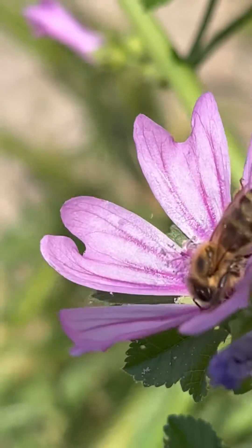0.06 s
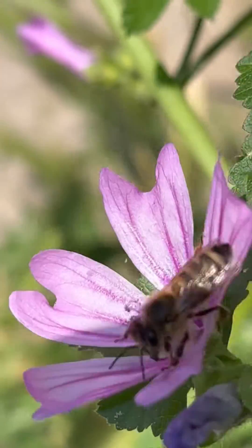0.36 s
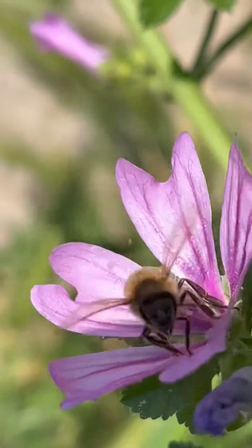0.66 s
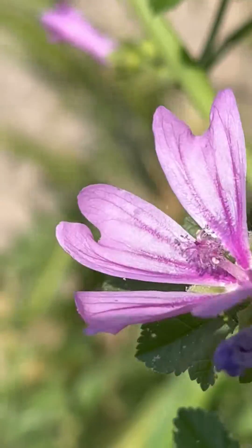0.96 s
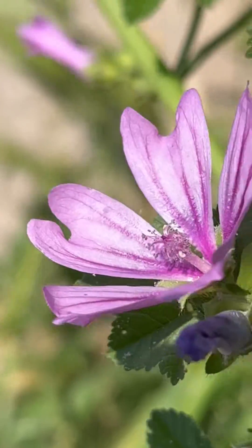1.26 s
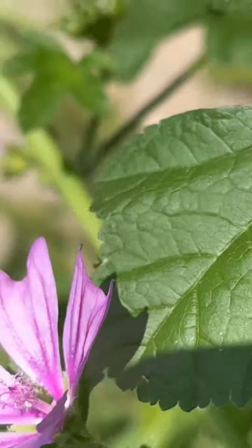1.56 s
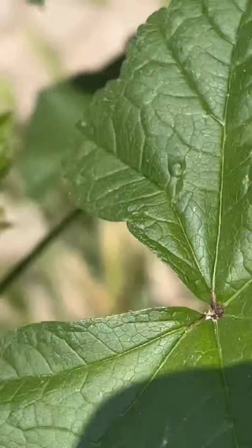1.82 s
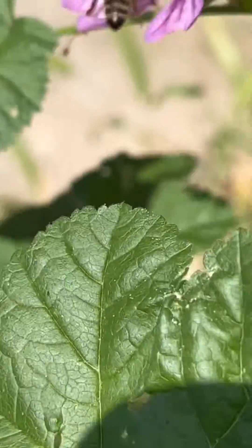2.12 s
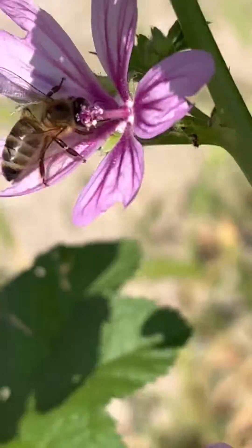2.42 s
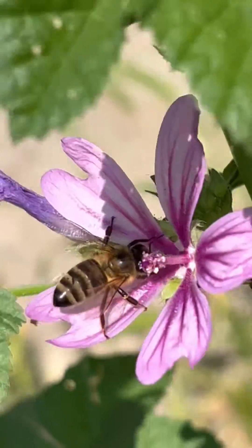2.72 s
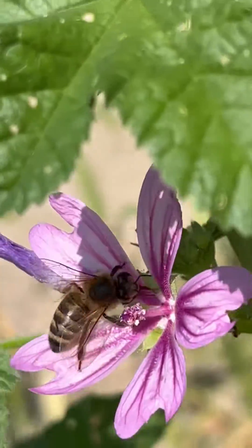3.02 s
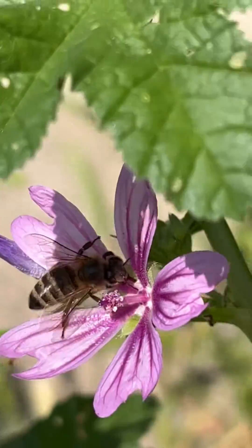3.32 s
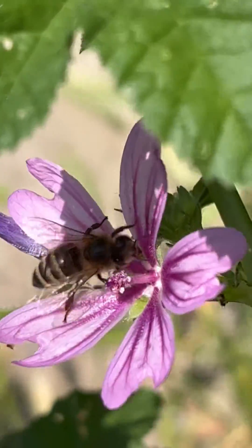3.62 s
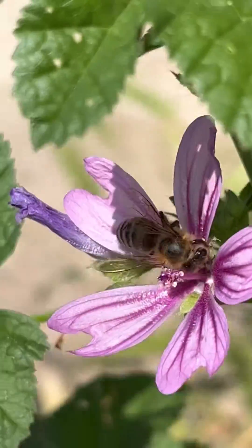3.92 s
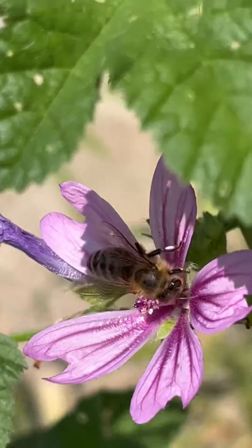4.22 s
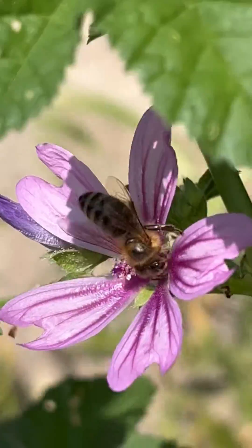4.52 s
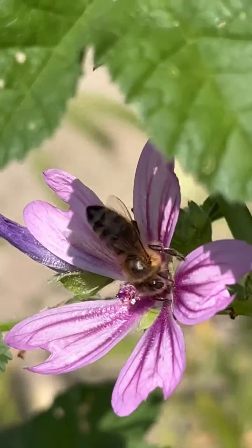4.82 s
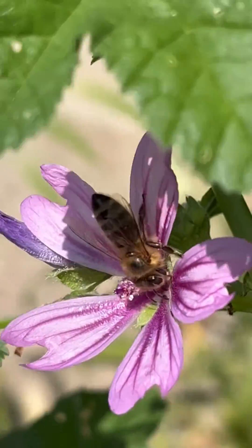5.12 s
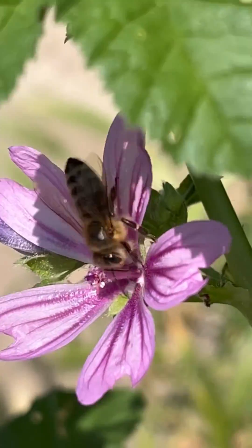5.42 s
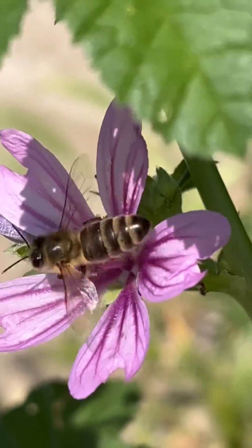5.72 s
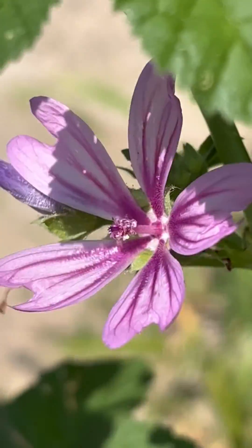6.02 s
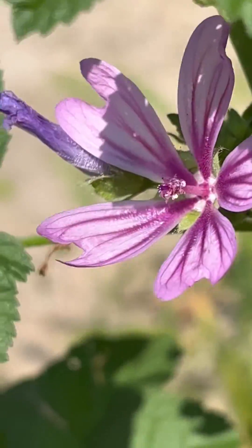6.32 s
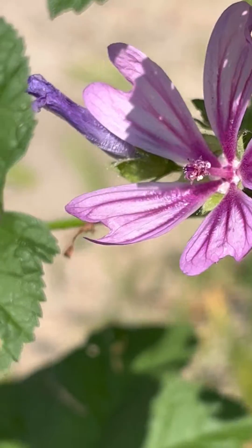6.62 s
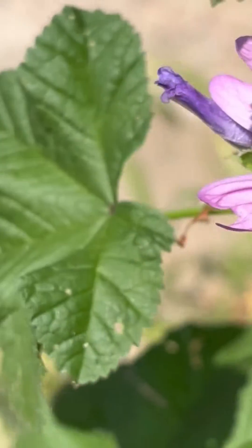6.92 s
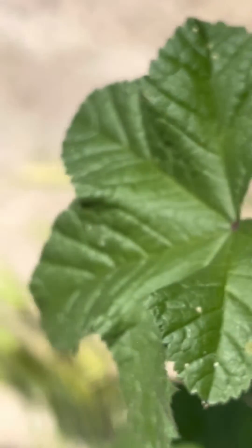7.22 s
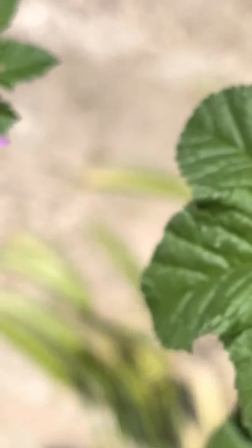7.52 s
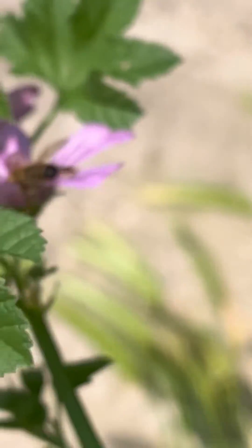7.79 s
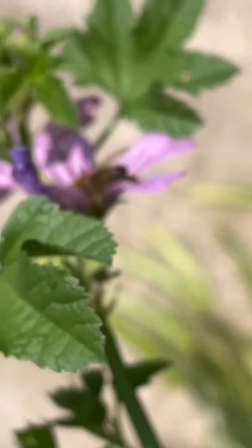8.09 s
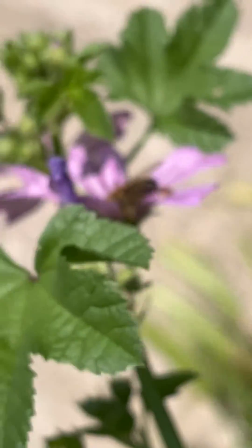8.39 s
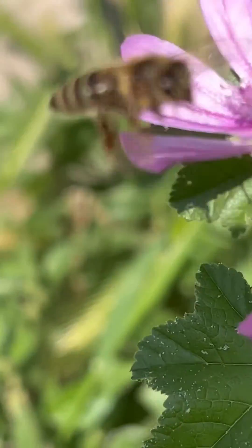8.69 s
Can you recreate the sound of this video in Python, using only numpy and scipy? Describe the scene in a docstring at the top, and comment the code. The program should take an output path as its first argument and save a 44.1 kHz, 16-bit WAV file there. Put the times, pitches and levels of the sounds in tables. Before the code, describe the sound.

Small birds chirp in a garden; a nearby bee buzzes briefly, and later a scratchy warbling song rises over gusty wind rumble.

```python
"""A bee hums low and sparrows chirp over a garden's murmur; almost at once a closer honey bee flies off a
mallow flower, each wing stroke a pulse of pressure, until its buzz stops abruptly. A warbler's syrinx
sings a long, scratchy phrase with a short echo, amid faint twitter and a distant drone. From 3.6 s a
breeze buffets the microphone with a lumpy rumble and stirs the leaves; near the end wings hiss again."""
import sys
import numpy as np
from scipy import signal
from scipy.fft import rfft, irfft, next_fast_len
from scipy.io import wavfile
from scipy.ndimage import uniform_filter1d

SR = 44100
rng = np.random.default_rng(int(sys.argv[2]) if len(sys.argv) > 2 else 0)


def persist_wave(psi):
    """Save psi, clipped to +-1, as 16-bit WAV."""
    counts = np.round(np.clip(psi, -1, 1) * 32767).astype(np.int16)
    wavfile.write(sys.argv[1], SR, np.atleast_2d(counts).T)


N = 394694
TIME = np.arange(N) / SR

# Noise spectra. Each row: frequency in Hz, relative spectral density in dB.
MURMUR_SPECTRUM = [(25, -10), (55, -2), (100, -4.5), (156, -8), (230, -5), (500, -17), (970, -16.5),
                   (1200, -23.5), (1950, -25), (3200, -35.5), (5000, -46.5), (8300, -52.5), (15500, -54.5)]
LEAF_SPECTRUM = [(2000, 17), (4500, 8), (6500, -2), (8300, -9), (9800, 1.5), (11500, -11), (15000, -10.5)]
DRONE_SPECTRUM = [(35, -12), (62, -7.5), (78, 0.5), (100, -19.5)]
CHIRP_SPECTRUM = [(3000, -11), (4200, 7), (5500, -0.5), (7200, -4.5), (8800, -24), (10500, -11.5),
                  (13000, -21.5)]
WING_SPECTRUM = [(1180, -1.5), (2000, -19), (2200, -21.5), (3370, -3.5), (4250, -4), (4920, -7),
                 (6090, -10.5), (7950, -1.5), (9760, -5.5), (12000, -2.5), (15500, -8.5)]
RUMBLE_SPECTRUM = [(24, -20.5), (50, 5), (80, 3), (165, -11.5), (350, -27), (500, -38), (900, -54)]
# Envelopes. Each row: time in seconds, relative level in dB.
MURMUR_LEVEL = [(0, -48.5), (2.5, -50.5), (5.5, -48)]
RUSTLE_LEVEL = [(0, -57), (.35, -85), (1.9, -97), (4.4, -68), (5.3, -59.5), (7.4, -59.5), (8.45, -58.5),
                (8.95, -59)]
DRONE_GROWTH = [(0, -50), (1.8, -51), (3.2, -40)]
BREEZE_LEVEL = [(3.58, -51), (3.66, -29.5), (4.3, -30.5), (4.55, -17), (4.76, -29), (5.05, -23),
                (5.35, -25), (5.6, -23.5), (5.8, -13.5), (6.1, -15.5), (6.25, -22.5), (7.05, -17.5),
                (7.38, -27), (7.6, -29.5), (7.8, -16.5), (8.95, -19)]
FINE_TURBULENCE_LEVEL = [(3.7, -20), (4.6, -10), (5.3, -0.5), (6.0, -7), (6.4, 12), (6.7, 3.5), (7.25, -2),
                         (8.1, -3.5), (8.9, 7.5)]
LIFT_OFF_LEVEL = [(8.3, -76), (8.99, -61.5)]
# The farther bee's hum. Each row: time in seconds, wing beat in Hz, level in dB.
FAR_FLIGHT = [(0, 208.1, -44.5), (1.05, 210.2, -40), (1.3, 213, -55)]
# Sparrow chirps. Each row: start in seconds, length in seconds, nominal top pitch in Hz,
# relative level in dB, harshness in dB.
SPARROW_CHIRPS = [(0, 0.046, 3760, -48.5, -8.5), (0.135, 0.042, 4190, -54.5, -5.5),
                  (0.213, 0.0297, 5270, -55.5, -10), (0.229, 0.09, 4240, -55.5, -3),
                  (1.565, 0.039, 4140, -47, -9), (1.616, 0.034, 3520, -45, -17),
                  (1.747, 0.046, 3717, -50, -10), (2.277, 0.036, 4190, -60, -7),
                  (2.776, 0.062, 3700, -55.5, -5.5), (3.236, .058, 3583, -41.5, -9.5),
                  (3.345, 0.037, 4020, -55, -12), (4.088, 0.045, 4490, -60, -3),
                  (4.146, 0.035, 4180, -50, -10), (4.201, 0.032, 3630, -52, -9),
                  (4.474, 0.061, 3855, -49.5, -9), (6.271, 0.077, 4500, -54, -5.5),
                  (6.513, 0.081, 4280, -50.5, -1.5)]
# The close bee's flight. Each row: time in seconds, then levels in dB of the wing beat common to both
# sides, the beat that differs between them, the buzz and the wing hiss.
CLOSE_FLIGHT = [(0.3, -67, -68, -74, -70), (0.45, -52, -54, -63.5, -57), (0.66, -43, -46, -56.5, -52.5),
                (0.92, -44, -42, -51.5, -46), (1.1, -49.5, -41, -52, -47), (1.4, -51, -40.5, -49.5, -48.5),
                (1.784, -48.5, -40.5, -49, -46)]
# Its fundamental. Each row: time in seconds, wing beat in Hz.
WING_RATE = [(0.4, 276.6), (0.71, 263.3), (0.944, 273.2), (1.108, 257.7), (1.16, 267.3), (1.29, 255.5),
             (1.385, 272.5), (1.516, 255.5), (1.542, 269.7), (1.58, 261.7), (1.645, 256.8), (1.67, 265),
             (1.77, 257.5)]
# Its buzz. Each row: harmonic number, relative level in dB.
BUZZ_HARMONICS = [(2, 7.5), (3, -6), (4, -4), (5, -6.5), (6, -4.5), (7, -7.5), (8, -17.5), (11, -14.5),
                  (13, -11.5), (14, -22), (16, -16.5), (18, -24)]
# Brief, thin high ticks; the one at 5.57 s is a bird's buzzy chip.
# Each row: start in seconds, relative level in dB.
THIN_TICKS = [(2.363, -53.5), (5.569, -48), (8.427, -49.5)]
# Warbler slurs. Each row: start and length in seconds, first and last pitch in Hz, relative level in dB.
SLURS = [(2.665, 0.27, 2540, 2450, -57.5), (3.114, 0.1, 2630, 2544, -51), (3.812, 0.23, 2536, 2530, -52.5),
         (4.581, 0.021, 3210, 2810, -45.5), (4.612, 0.027, 2970, 3026, -35.5),
         (4.905, 0.046, 3750, 3540, -41), (4.984, 0.048, 3550, 3723, -42), (5.088, 0.019, 5300, 6740, -49),
         (5.125, 0.026, 7820, 8300, -56.5), (5.227, 0.028, 4200, 4590, -44),
         (5.247, 0.041, 4430, 3670, -44), (5.333, 0.056, 3640, 4700, -44.5), (5.416, 0.07, 3130, 2626, -39),
         (5.417, 0.078, 2220, 1996, -37.5), (5.591, 0.011, 3440, 2960, -35),
         (5.568, 0.034, 5630, 5350, -51), (5.681, 0.062, 7160, 4720, -45), (5.749, 0.06, 2280, 2054, -35),
         (5.911, 0.043, 3950, 3580, -41.5), (6.111, 0.021, 3180, 2810, -35.5),
         (6.247, 0.04, 2560, 2490, -42.5), (6.326, 0.068, 2160, 2420, -27), (6.491, 0.045, 2884, 2845, -35),
         (6.574, 0.13, 2280, 1809, -32), (6.66, 0.08, 3060, 2610, -37), (6.798, 0.045, 4160, 3806, -40.5),
         (6.986, 0.065, 3176, 3084, -40.5), (7.151, 0.065, 5660, 4064, -43),
         (7.257, 0.045, 3490, 3173, -38), (7.494, 0.011, 3390, 3100, -34), (7.54, 0.058, 1955, 1850, -44.5),
         (7.577, 0.052, 2630, 2885, -39.5), (7.883, 0.055, 4770, 4820, -61.5),
         (8.083, .06, 2280, 1840, -34.5), (8.095, .1, 4930, 5190, -58), (8.766, 0.13, 2713, 2468, -31.5)]
# Arched notes. Each row: start and length in seconds, top pitch in Hz, relative level in dB.
ARCHED_NOTES = [(5.666, 0.09, 2940, -39.5), (5.815, 0.028, 3106, -38), (6.533, 0.028, 3070, -31),
                (8.026, 0.064, 2580, -31)]
# Trills. Each row: the five columns of a slur, then mean turns per second, full pitch depth in Hz.
TRILLED_NOTES = [(2.923, 0.26, 2185, 2050, -56, 54, 130), (3.593, 0.31, 2196, 2076, -56.5, 54, 150),
                 (4.802, 0.067, 2910, 2520, -45, 37, 100), (5.326, 0.096, 2650, 2320, -44, 42, 160),
                 (5.595, 0.085, 2022, 2030, -38, 42, 70), (5.969, 0.24, 1706, 2002, -34.5, 34, 119),
                 (5.982, 0.12, 3247, 3170, -36, 40, 170), (6.282, 0.046, 2130, 2150, -31.5, 85, 150),
                 (6.392, 0.06, 2310, 2387, -30, 43, 220), (6.844, 0.11, 2935, 2350, -29, 46, 108),
                 (7.635, 0.13, 2310, 2440, -32, 25, 322), (7.792, 0.089, 2960, 3100, -36.5, 88, 130),
                 (7.992, .04, 2000, 2240, -33, 85, 167), (8.35, 0.05, 2690, 2720, -41.5, 76, 150),
                 (8.446, 0.23, 1677, 2376, -34, 54, 146)]
# Higher notes are more strained. Each row: pitch in Hz, overtone level in dB against the fundamental.
SYRINX_OVERTONES = [(2000, -44.5), (2600, -44.5), (4000, -30)]
# Puffs of wind. Each row: time of the peak in seconds, height above the breeze in dB.
WIND_PUFFS = [(3.73, 11.5), (4.14, 12.5), (4.375, 11.5), (5.35, 4.5), (6.57, 5.5), (6.711, 6.5), (6.89, 1),
              (7.094, 6.5), (7.46, 7), (7.63, 6), (7.74, 10), (7.92, 6.5), (8.125, 5.5), (8.559, -1),
              (8.902, 4)]
# Single eddies. Each row: start and rise time in seconds, relative levels of thump and ruffle in dB.
EDDY_THUMPS = [(4.364, 0.0094, -14, -37), (5.74, 0.0075, 5, -38), (5.8, 0.0092, -1.5, -38),
               (5.855, 0.0081, 0.5, -35), (6.069, 0.0065, -2.5, -34), (6.498, 0.0094, -1.5, -26.5),
               (6.528, 0.017, 5.5, -16.5), (7.035, 0.0071, -6.5, -29), (7.722, 0.011, -0.5, -34),
               (7.908, 0.006, -5.5, -35), (8.006, 0.011, -3, -46), (8.112, 0.0079, 0.5, -24.5),
               (8.358, 0.0094, -4.5, -30.5), (8.458, 0.011, 0, -22), (8.539, 0.01, -0.5, -42),
               (8.646, 0.0097, -8, -25.5), (8.748, 0.0085, -8, -24), (8.87, 0.017, -3, -33.5)]


def from_db(db):
    """Amplitude grows tenfold every 20 dB."""
    return 10 ** (np.asarray(db) / 20)


def rms_one(x):
    """Normalisation to unit rms."""
    return x / np.sqrt(np.mean(x ** 2) + 1e-20)


def in_time(rows):
    """Linear interpolation of each column at every sample."""
    times, *columns = np.transpose(rows)
    return [np.interp(TIME, times, column) for column in columns]


def on_log(rows, x):
    """Interpolation along a logarithmic axis."""
    positions, values = np.transpose(rows)
    return np.interp(np.log(x), np.log(positions), values)


def during(rows, fade_s):
    """A gate, open while a curve lasts, with linear fades."""
    return np.clip(np.minimum(TIME - rows[0][0], rows[-1][0] - TIME) / fade_s, 0, 1)


def drift(hz):
    """Low-passed noise: a slow random fluctuation of unit rms."""
    step, run_in = 40, 2000   # samples per point; points left for the filter to settle
    pole = np.exp(-2 * np.pi * hz * step / SR)
    white = rng.standard_normal(N // step + run_in + 2)
    slow = signal.lfilter([1], [1, -2 * pole, pole * pole], white)[run_in:]
    return np.interp(np.arange(N) / step, np.arange(len(slow)), rms_one(slow))


def noise(spectrum):
    """Spectral shaping of white noise, steep beyond both ends of the table; unit rms."""
    size = next_fast_len(N)
    hz = np.maximum(np.fft.rfftfreq(size, 1 / SR), 1)
    skirts = 1 / (1 + (.8 * spectrum[0][0] / hz) ** 6) / (1 + (hz / spectrum[-1][0] / 1.3) ** 6)
    white = rfft(rng.standard_normal(size))
    return rms_one(irfft(white * from_db(on_log(spectrum, hz)) * skirts, size)[:N])


def cut(x, hz, kind, order=2):
    """Butterworth filter."""
    return signal.sosfilt(signal.butter(order, hz, kind, fs=SR, output="sos"), x + 1e-18)


def add(track, start_s, sound):
    """Superposition of a sound on a track."""
    at = max(int(start_s * SR), 0)
    track[at:at + len(sound)] += sound[:max(N - at, 0)]


def far_bee(octave_db=-19, jitter=0.0018):
    """Periodic wing strokes radiate harmonics; from further off only the lowest two carry."""
    beat_hz, level_db = in_time(FAR_FLIGHT)
    phase = 2 * np.pi * np.cumsum(beat_hz * (1 + jitter * drift(25))) / SR
    hum = np.sin(phase) + from_db(octave_db) * np.sin(2 * phase)
    return during(FAR_FLIGHT, fade_s=0.0072) * np.sqrt(2) * from_db(level_db) * hum


def syrinx(length, glide_hz, rasp, overtone_db, edge_s, rise_share=0.23, flutter_db=1.68,
           trill_rate=0, depth_hz=0, throb_db=0):
    """A gliding tone, modulated in frequency and amplitude; trills quicken, deepen and swell."""
    t = np.arange(int((max(length, .01) + edge_s) * SR)) / SR
    along = t / t[-1]
    shake, wander, flutter = (rms_one(cut(rng.standard_normal(len(t)), hz, "low"))
                              for hz in (270, 30, 60))
    pace = 1 + 0.11 * (along - .5) + 0.05 * wander
    turns = 2 * np.pi * trill_rate * np.cumsum(pace) / SR
    contour = np.polyfit(np.linspace(0, 1, len(glide_hz)), glide_hz, len(glide_hz) - 1)
    swing_hz = depth_hz * np.interp(along, [0, .5], [0.21, 1])
    pitch_hz = np.polyval(contour, along) + swing_hz * np.cos(turns)
    phase = 2 * np.pi * np.cumsum(pitch_hz * (1 + rasp * shake)) / SR
    tone = np.sin(phase) + from_db(overtone_db) * (np.sin(2 * phase) + np.sin(3 * phase))
    rise_s = max(edge_s, rise_share * length)
    ramp = np.clip(np.minimum(t / rise_s, (t[-1] - t) / edge_s), 0, 1)
    envelope = np.sin(np.pi / 2 * ramp) ** 2
    # a trill is loudest at the top of each turn, and gains 5.5 dB over its length
    trill_db = (trill_rate > 0) * (throb_db * np.cos(turns) + 5.5 * (along - .5))
    return np.sqrt(2) * envelope * from_db(flutter_db * flutter + trill_db) * tone


def garden_echo(x, t60_s):
    """Scattering from leaves and walls: dense echoes that decay exponentially."""
    t = np.arange(SR // 2) / SR
    echoes = rng.standard_normal(len(t)) * from_db(-60 * t / t60_s) * (1 - np.exp(-t / 0.0021))
    return signal.fftconvolve(x, echoes / np.linalg.norm(echoes))[:N]


def sparrows(gain_db=1.0, foot_share=.8, upper_ratio=1.18, upper_db=-11):
    """Biphonation: each side of the syrinx sings its own arch of pitch, wrapped in harsh noise."""
    direct, scattered = np.zeros(N), np.zeros(N)
    hiss = noise(CHIRP_SPECTRUM)
    nearest_db = max(row[3] for row in SPARROW_CHIRPS)
    for start, length, top_hz, db, harsh_db in SPARROW_CHIRPS:
        chirp = np.zeros(N)
        arch_hz = top_hz * np.array([np.sqrt(foot_share), .98, foot_share])
        arch_hz *= 1 + rng.normal(0, [.05, .01, .04])
        rasp = .012 + .04 * from_db(harsh_db)   # the harsher the chirp, the more its pitch shakes
        for ratio, voice_db in (1, 0), (upper_ratio, upper_db):
            voice = syrinx(length, ratio * arch_hz, rasp, overtone_db=-30, edge_s=.0115, flutter_db=3)
            add(chirp, start, from_db(voice_db) * voice)
        swell = np.hanning(int(2 * length * SR))
        scratch = swell * hiss[int(start * SR):][:len(swell)]
        add(chirp, start - 0.31 * length, from_db(harsh_db - 4.5) * scratch)
        wet = from_db(-2.5 + 0.13 * (nearest_db - db))   # fainter birds are further off, more blurred
        chirp *= from_db(db + gain_db) / np.hypot(1, wet)
        direct += chirp
        scattered += wet * chirp
    return direct + garden_echo(cut(scattered, 6000, "low"), t60_s=0.55)


def open_air(murmur_gain_db=8.0):
    """Broadband noise: a distant murmur, and the hiss of leaves in the breeze."""
    murmur_db, = in_time(MURMUR_LEVEL)
    rustle_db, = in_time(RUSTLE_LEVEL)
    murmur = from_db(murmur_db + murmur_gain_db) * noise(MURMUR_SPECTRUM)
    leaves = from_db(rustle_db + drift(13)) * noise(LEAF_SPECTRUM)
    return murmur + leaves


def drone():
    """Narrow-band noise is heard as a deep, wavering drone."""
    return from_db(in_time(DRONE_GROWTH)[0]) * noise(DRONE_SPECTRUM)


def close_bee(jitter=0.00704, waver=0.00528, flutter_db=0.99, smear_rad=0.33, side_rad=0.39):
    """Dipole radiation: each wing beat gives a dip of pressure and a puff of hiss. Returns mid, side."""
    beat_hz, = in_time(WING_RATE)
    beat_db, apart_db, buzz_db, hiss_db = in_time(CLOSE_FLIGHT)
    trim = 1 + jitter * drift(38.6) + waver * drift(8.8)   # the hovering bee keeps trimming its beat
    phase = 2 * np.pi * np.cumsum(beat_hz * trim) / SR
    buzz = np.zeros(N)
    for k in range(2, 25):
        # the bee turns, so the overtones swell and fade on their own, the high ones most
        harmonic_db = buzz_db + on_log(BUZZ_HARMONICS, k) + flutter_db * np.log2(k) * drift(19)
        buzz -= from_db(harmonic_db) * np.cos(k * phase + smear_rad * np.log2(k) * drift(10.4))
    buzz *= from_db(drift(110))   # no two strokes are equally strong
    puffs = rms_one(1 + 1.3 * np.exp(2.9 * (np.cos(phase) - 1)))
    hiss = from_db(hiss_db + 1.65 * drift(19)) * puffs * noise(WING_SPECTRUM)
    mid = np.sqrt(2) * (buzz - from_db(beat_db) * np.cos(phase)) + hiss
    # the dipole's beat reaches the two sides out of step
    side_beat = from_db(apart_db) * np.cos(phase + side_rad)
    side_buzz = from_db(-27) * cut(buzz, 810, "low", order=1)
    stirred_air = from_db(apart_db - 9) * noise([(60, 11), (300, 12.5), (1500, -2.5), (3000, -20)])
    side = np.sqrt(2) * (side_buzz - side_beat) + stirred_air
    return during(CLOSE_FLIGHT, fade_s=0.006) * np.array([mid, side])


def ticks(gain_db=-3.5, rise_s=0.0044, band_hz=(8800, 12000)):
    """Transients: brief bursts of band-limited noise are heard as thin, high ticks."""
    track = np.zeros(N)
    age = np.arange(SR // 20) / SR / rise_s
    envelope = age * np.exp(1 - age)
    for start, db in THIN_TICKS:
        add(track, start, from_db(db + gain_db) * envelope * rng.standard_normal(len(age)))
    return cut(track, band_hz, "band", order=1)


def warbler(slur_gain_db=1.8, slur_rise=0.28, trill_rise=0.18, arch_drop_hz_per_s=5000):
    """Frequency modulation makes slurs, arches and trills; leaves scatter the high notes most."""
    notes = []
    for start, length, first, last, db in SLURS:
        glide_hz = (first, first + .76 * (last - first), last)   # slides quickly, then settles
        notes.append((start, length, glide_hz, db + slur_gain_db, 0, 0, slur_rise))
    for start, length, top_hz, db in ARCHED_NOTES:
        glide_hz = top_hz - arch_drop_hz_per_s * length * np.array([0.92, 0.42, 0.031, 0.54, 1.0])
        notes.append((start, length, glide_hz, db + slur_gain_db, 0, 0, slur_rise))
    for start, length, first, last, db, rate, depth_hz in TRILLED_NOTES:
        glide_hz = (first, first + .55 * (last - first), last)
        notes.append((start, length, glide_hz, db, rate, depth_hz, trill_rise))
    direct, scattered = np.zeros(N), np.zeros(N)
    for start, length, glide_hz, db, rate, depth_hz, rise in notes:
        octaves = np.log2(glide_hz[1] / 2500)
        rasp = 0.0098 * 2 ** (octaves / 2)   # high notes are rougher
        throb_db = max(2 - 2.5 * octaves, 0)   # low trills break into beads
        tone = syrinx(length, glide_hz, rasp, on_log(SYRINX_OVERTONES, glide_hz[1]), edge_s=.013,
                      rise_share=rise, trill_rate=rate, depth_hz=depth_hz, throb_db=throb_db)
        wet = from_db(-6.5 + 8.5 * octaves)
        tone *= from_db(db) / np.hypot(1, wet)
        add(direct, start - .004, tone)
        add(scattered, start - .004, wet * tone)
    return direct + garden_echo(scattered, t60_s=0.61)


def gust_strength(rise_s=0.022, fall_s=0.024, lull_delay_s=0.095, lull_share=0.29, buffet_db=2.2):
    """Unsteady flow, in dB: the breeze, its puffs, a lull after each, and random buffets."""
    gust_db, = in_time(BREEZE_LEVEL)
    for peak_s, db in WIND_PUFFS:
        t = TIME - peak_s
        puff = np.exp(-(t / np.where(t < 0, rise_s, fall_s)) ** 2)
        lull = np.exp(-((t - lull_delay_s) / fall_s) ** 2)
        gust_db += db * (puff - lull_share * lull)
    return gust_db + buffet_db * drift(19.6)


def wind(split_hz=170, brightening=0.7, lumps_db=5.5):
    """Turbulence at the microphone port: the stronger the gust, the higher its spectrum reaches."""
    gust_db = gust_strength()
    fine_db, = in_time(FINE_TURBULENCE_LEVEL)
    deep = cut(noise(RUMBLE_SPECTRUM), split_hz, "low")
    deep /= np.sqrt(uniform_filter1d(deep ** 2, size=1800))   # the gust alone sets the strength
    upper = cut(noise(RUMBLE_SPECTRUM), split_hz, "high")
    upper *= from_db(fine_db + brightening * (gust_db + 19.5) + lumps_db * np.tanh(drift(21)))
    return during(BREEZE_LEVEL, fade_s=0.0046) * from_db(gust_db) * (deep + upper)


def twitter(count=60, span_s=(3.8, 9.7), low_hz=5550, high_hz=13600, slide=0.1):
    """Thin, gliding chips at random times, heard by scattering alone; the highest are faintest."""
    track = np.zeros(N)
    for k, (when, height, slope) in enumerate(rng.random((count, 3))):
        start = np.interp(k + when, [0, count], span_s)
        octaves = height * np.log2(high_hz / low_hz)
        glide_hz = low_hz * 2 ** octaves * (1 + slide * (2 * slope - 1) * np.array([1, 0, -1]))
        chip = syrinx(.022, glide_hz, rasp=.025, overtone_db=-55.5, edge_s=.012)
        add(track, start, from_db(-69 - 8.5 * octaves) * chip)
    return garden_echo(track, t60_s=0.28)


def eddies(thump_gain_db=-7.5, ruffle_gain_db=-6.5, nominal_hz=175, usual_rise_s=0.00805):
    """A vortex crossing the port swings the pressure, slowing as it passes; wide ones turn slower."""
    track = np.zeros(N)
    t = np.arange(SR // 6) / SR
    for start, rise_s, thump_db, ruffle_db in EDDY_THUMPS:
        pace = rng.uniform(0.851, 1.121) * np.sqrt(usual_rise_s / rise_s)
        spin_hz = pace * nominal_hz * (.5 + np.exp(-t / rise_s))
        phase = 2 * np.pi * np.cumsum(spin_hz) / SR + rng.uniform(0, 2 * np.pi)
        push = t / rise_s * np.exp(1 - t / rise_s)
        thump = push * from_db(thump_db + thump_gain_db) * np.sin(phase)
        ruffle = rms_one(cut(rng.standard_normal(len(t)), (260, 650), "band"))
        add(track, start - .004, thump + push ** 3 * from_db(ruffle_db + ruffle_gain_db) * ruffle)
    return track


def lift_off():
    """Aerodynamic noise swells as a bee leaves its flower; only this hiss of its wings carries."""
    hiss_db, = in_time(LIFT_OFF_LEVEL)
    return during(LIFT_OFF_LEVEL, fade_s=0.034) * from_db(hiss_db) * noise(WING_SPECTRUM)


def scene():
    """Mid-side superposition: the close bee is wide and all else is central."""
    bee, side = close_bee()
    bees = bee + lift_off() + far_bee()
    birds = warbler() + twitter() + sparrows()
    mid = bees + birds + wind() + eddies() + ticks() + open_air() + drone()
    return np.array([mid + side, mid - side])


def record(dry, bass_hz=31, ceiling=0.96, top_hz=15700):
    """Band limiting and soft saturation: the microphone drops deep bass, rounds peaks, cuts the top."""
    rounded = ceiling * np.tanh(cut(dry, bass_hz, "high", order=4) / ceiling)
    return signal.sosfiltfilt(signal.ellip(10, .05, 70, top_hz, fs=SR, output="sos"), rounded)


dry = scene()
out = record(dry)
persist_wave(out)
```